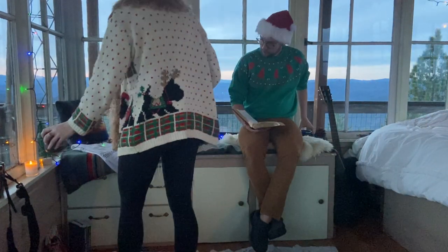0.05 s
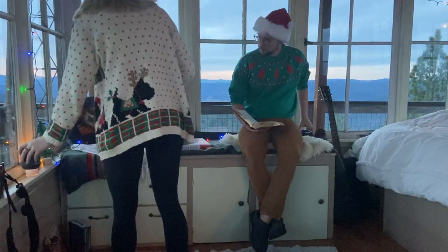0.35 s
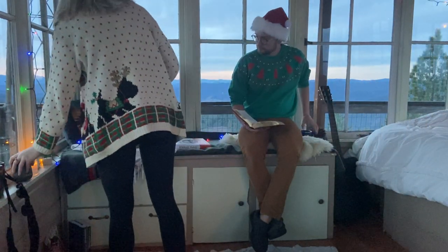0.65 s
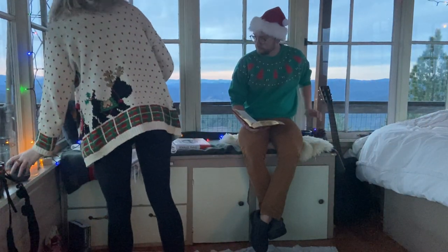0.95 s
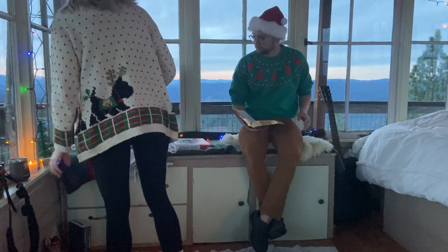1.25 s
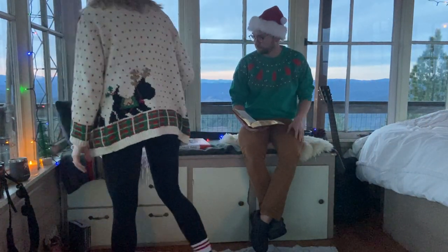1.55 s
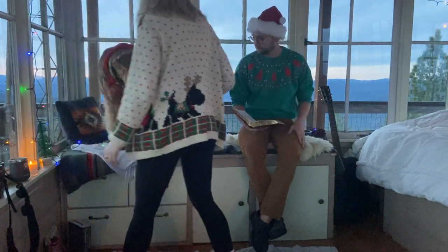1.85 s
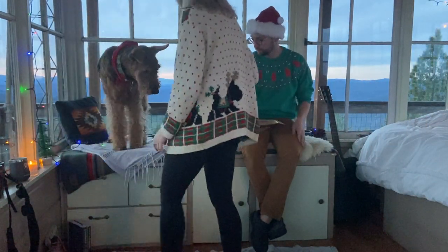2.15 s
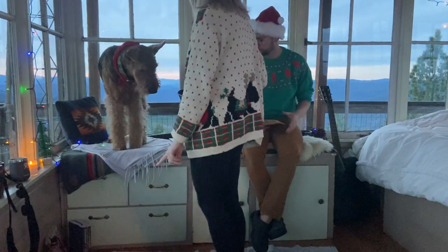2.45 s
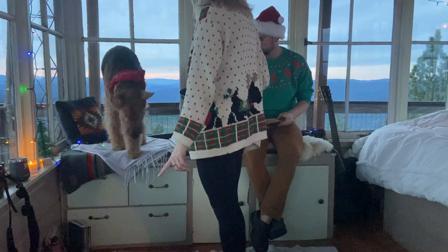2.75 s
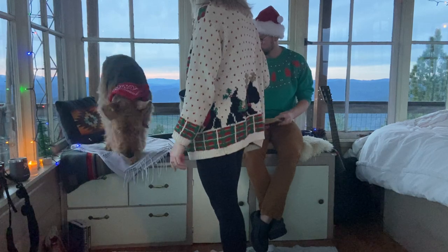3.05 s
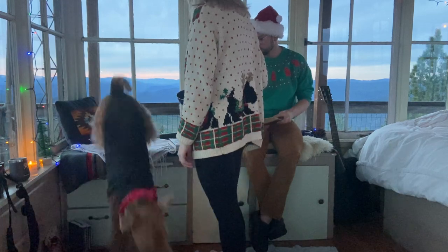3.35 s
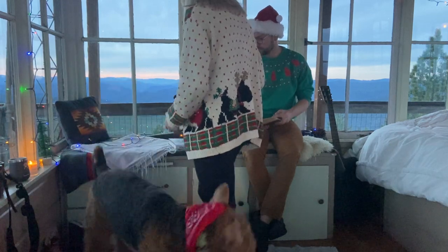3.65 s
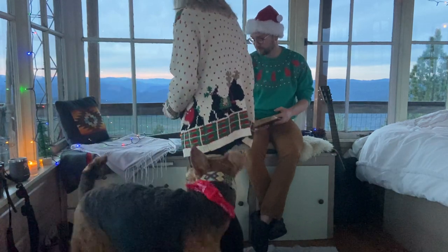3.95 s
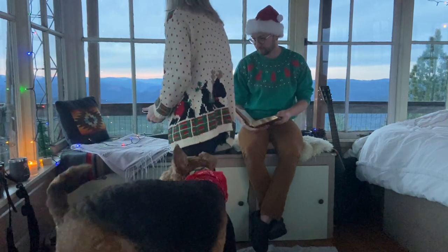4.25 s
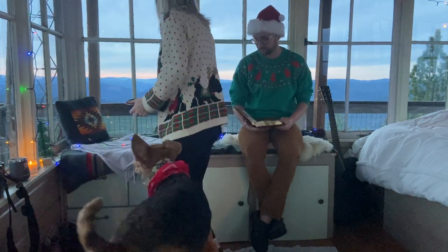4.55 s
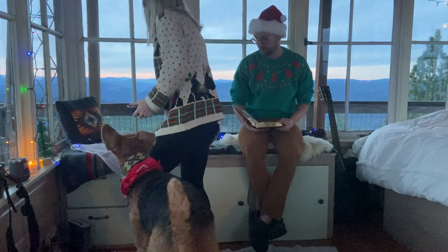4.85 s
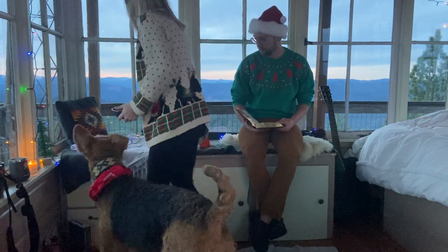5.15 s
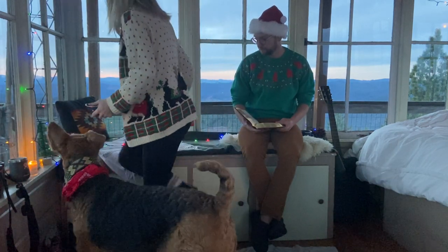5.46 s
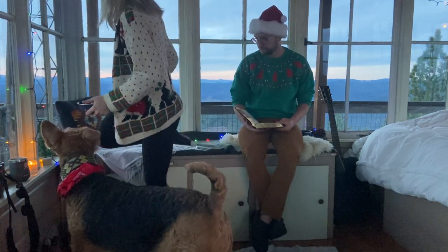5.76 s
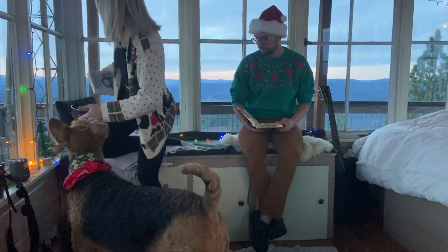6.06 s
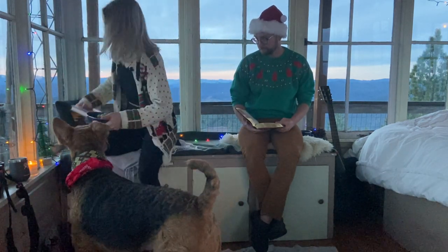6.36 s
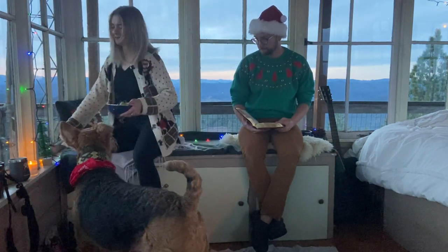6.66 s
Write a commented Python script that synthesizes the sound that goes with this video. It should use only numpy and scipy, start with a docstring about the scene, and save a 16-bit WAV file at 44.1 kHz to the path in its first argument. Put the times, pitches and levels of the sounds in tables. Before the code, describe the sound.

An ornament is set on a ledge with a ringing knock and rocks briefly. After a lull, a dog jumps off a bench, forepaws then hind paws thudding on the wooden floor, and walks around with bright tag clinks, claw ticks and light clatter. Cloth rustles, a person kneels with dull bumps, and a flat object clacks down. The stereo microphone stands in a small, quiet room with close walls.

```python
"""A small wooden room with many windows, heard on a stereo microphone inside, with walls close by.
Cloth rustles, an ornament knocks and rocks on a ledge a little to the left, and someone steps aside.
A big dog shuffles over the blanket on a window bench, jumps down and walks about: the floorboards thud,
claws tick, two collar tags clink and small things clatter. Then the person kneels on the padded bench
with a run of soft bumps, and last of all a flat object is put down."""
import sys
import numpy as np
from scipy import signal
from scipy.io import wavfile
from scipy.ndimage import uniform_filter1d

SR = 44100
rng = np.random.default_rng(int(sys.argv[2]) if len(sys.argv) > 2 else 0)


def dump(signal):
    """Clip the signal to [-1, 1] and save it as 16-bit WAV at the path in sys.argv[1]."""
    limited = np.clip(np.atleast_2d(signal).T, -1, 1)
    pcm = np.round(limited * 32767).astype(np.int16)
    wavfile.write(sys.argv[1], SR, pcm)


N = 300034
BAND_HZ = 28 * 2 ** np.arange(0, 9.3, .4)
TAIL = np.arange(int(.8 * SR)) / SR   # seconds since a contact
LEFT_RIGHT = np.array([[1], [-1]])

# The room's decay. Each row: frequency in Hz, t60 in seconds.
ROOM_T60 = [(50, 0.33), (150, 0.49), (500, 0.39), (1500, 0.39), (4000, 0.36), (8000, .3), (15000, 0.42)]
# First reflections off the near walls. Each row: delay in seconds, level in dB.
NEAR_WALLS = [(.0013, -11), (.0029, -7), (.0052, -15.5), (.0083, -15)]
# How alike the microphone's two sides are. Each row: frequency in Hz, correlation.
LIKENESS = [(50, .98), (130, .92), (250, .7), (500, .2), (1000, .12), (2000, .2), (4000, .45), (9000, .4),
            (11400, 0)]
# The lean to the left. Each row: frequency in Hz, left minus right in dB.
LEFT_DB = [(50, 2.5), (250, 1.1), (600, 3), (2500, 5), (8000, 0.6)]

# Noise colours at the microphone. Each row: frequency in Hz, spectral density in dB.
STILL_AIR = [(25, -8), (90, -5.5), (260, -14), (460, -18), (800, -25), (2500, -31), (4300, -30.5),
             (7000, -38.5), (11000, -34), (15000, -40.5)]
FLOOR_RUMBLE = [(25, -19), (40, -1.5), (58, 4.5), (110, -12), (200, -18.5), (400, -39), (1000, -55)]
CLOTH_RUB = [(100, -3), (250, 0), (500, 1), (1000, -6), (1800, -13), (4000, -35.5)]
CLOTH_SWISH = [(700, -13.5), (1800, -1.5), (3000, -3), (4300, 0), (6000, -9), (8000, -7.5), (11000, -15),
               (15000, -11.5)]
WOOD_KNOCK = [(60, -23), (140, -0.5), (300, -2), (500, 0.5), (900, -8), (1600, -15.5), (3200, -21.5),
              (5500, -30.5), (8000, -40.5), (15000, -32.5)]
TRINKET_CLICK = [(400, 13), (1000, 5), (2500, -5.5), (3500, 1.5), (7000, -4), (9000, -8.5), (15000, -8)]
TICK_TIP = [(700, -4), (1500, -0.5), (3000, 2.5), (4500, 0), (7000, -1.5), (11000, -7), (15000, -8.5)]
TICK_WOOD = [(120, -9.5), (350, 2.5), (700, -4.5), (1200, -6.5), (2200, -26), (6000, -41)]
FLOOR_THUD = [(28, -20.5), (50, 2.5), (120, -3), (220, -21), (450, -5), (900, -32.5), (2000, -35.5),
              (15000, -56.5)]
TAG_CLICK = [(2000, -31), (4000, -10.5), (8000, 2), (11500, -4.5), (15000, -13)]

# Modes that a blow sets ringing. Each row: frequency in Hz, level in dB, t60 in seconds.
ORNAMENT_KNOCK_MODES = [(118.5, -4, 0.36), (154.75, -10, 0.86), (251, -8.5, 0.84), (284, -15, 0.91),
                        (333, -18, 1), (422, -8, 0.37), (485.6, 9, 0.21), (568, -5, 0.46), (632, -16, 0.15),
                        (730, -5.5, 0.29), (750, -19.5, 0.97), (1000, -15, 0.21), (1390, -8.5, 0.26),
                        (1626, -12.5, 0.37), (2550, -18.5, 0.55), (2880, -13, 0.18), (3170, -14, .28),
                        (3680, -27.5, 0.17), (4430, -8, 0.19), (4390, -18, 0.25), (5830, -30, 0.13)]   # the ornament, the ledge and nearby things ringing together
FLAT_OBJECT_MODES = [(335, 4.5, 0.17), (433, -4, 0.12), (676, -2, 0.081), (980, -7, 0.096),
                     (1366, -7.5, 0.064), (3000, -23, 0.072)]
FLOOR_MODES = [(49.2, 0, 0.59), (55.3, -8.5, 0.58), (86.2, 2.5, 0.34), (121, 4.5, 0.18),
               (148.4, -6.5, 0.32), (194.6, -5, 0.23), (290, -10, 0.16), (382, -7, 0.091), (474.4, 0, 0.13),
               (572, -10, 0.3), (704, -25.5, 0.15), (996, -6.5, 0.22), (1070, -17, 0.16)]
LARGE_TAG_MODES = [(8120, -16, .12), (9432, -16, .16), (9810, -1, .24), (9866, 0, .26), (9913, -3, .24),
                   (10100, -3, .035), (14330, -9, .17)]
SMALL_TAG_MODES = [(8250, -18, .1), (11220, -7, .07), (11410, 0, .22), (11472, -2, .22), (11554, -10, .17),
                   (11700, -2, .035), (14400, -10, .16), (14650, -7, .04)]
# Modes of the small hard things. Each entry: frequency in Hz, with its level in dB on the next line.
TRINKET_HZ = [1500, 2520, 3200, 3750, 5430, 5830, 6500, 6910]
TRINKET_DB = [15.5, -7.5, 7, 13, -6.5, -15, 2, 19]

# The floor's rumble under shifting weight. Each row: time in seconds, level in dB.
FLOOR_STIR = [(0.0, -62), (0.98, -62.5), (1.42, -74), (2.33, -75.5), (3.13, -58), (3.31, -57.5),
              (3.66, -50.5), (3.9, -56), (5.47, -62), (5.74, -68.5), (6.46, -61.5), (6.8, -69)]
# Clothes, blanket and fur. Each row: start in seconds, length in seconds, rubbing in dB, swish in dB.
STROKES = [(0, 0.69, -73, -92), (0.937, .27, -75, -72), (1.702, 0.37, -82, -96), (2.738, .3, -64, -67.5),
           (3.024, .1, -61.5, -74), (3.728, 0.66, -64, -73.5), (4.482, .53, -67.5, -69.5),
           (5.497, 0.64, -74, -70.5), (6.262, 0.18, -78.5, -74.5)]
# Dull wooden bumps: paws, knees and hands on the bench, and one paw's knock on the floor.
# Each row: start in seconds, level in dB, pitch in Hz.
WOODEN_BUMPS = [(0.004, -45.5, 133.4), (2.024, -63.5, 195), (2.808, -56.5, 201), (3.099, -45.5, 100.5),
                (3.188, -46, 105), (4.009, -41, 357), (4.57, -58, 400), (5.191, -47, 127.6),
                (5.761, -46.5, 263.5), (6.068, -44.5, 278.6)]
# The ornament landing and rocking, and the flat object put down on the bench.
# Each row: start in seconds, level in dB, contact cut-off in Hz.
ORNAMENT_BLOWS = [(.741, -29.5, 11300), (.759, -30.5, 1560), (.785, -40.5, 1100), (.856, -46, 8000),
                  (0.859, -39, 444), (.881, -36.5, 200), (0.95, -49, 303)]
FLAT_OBJECT_BLOWS = [(6.739, -39.5, 12300), (6.744, -54, 2000), (6.765, -49, 5000), (6.788, -54, 900)]
# Small things knocking together. Each row: start in seconds, level in dB, favoured pitch in Hz.
CLATTER = [(0.855, -56.5, 3600), (3.757, -49, 6500), (3.774, -46, 6560), (4.581, -50, 3820),
           (4.607, -51, 3720), (5.083, -51.5, 3300), (5.092, -51, 6800), (5.098, -44, 2950)]
# Single hard contacts. Each row: start in seconds, tip in dB, wood in dB, contact cut-off in Hz.
TICKS = [(.166, -59, -64, 6150), (.365, -68, -64.5, 3980), (.447, -80, -64, 3000), (.534, -84.5, -61, 2940),
         (1.809, -67, -69.5, 3960), (2.029, -76, -69, 3000), (2.708, -67, -61.5, 3970),
         (3.03, -55.5, -70, 14100), (3.584, -59, -52.5, 12000), (4.203, -57.5, -64, 13040),
         (4.479, -78, -59, 3010), (4.802, -53.5, -55, 5960), (5.236, -56, -59.5, 13900),
         (5.756, -59.5, -50, 5030), (6.07, -53.5, -66.5, 9000), (6.705, -57, -57.5, 7030)]
# Soft treads with no click. Each row: start in seconds, level in dB, contact cut-off in Hz.
TREADS = [(0.199, -47.5, 122), (.29, -50, 230), (1.79, -60.5, 70), (2.498, -55, 60), (3.068, -49, 78),
          (3.171, -39.5, 66), (4.34, -51.5, 60), (4.418, -48.5, 70), (5.199, -55, 50)]
# The dog walking. Each row: start in seconds, claws in dB, weight in dB.
PAW_STEPS = [(4.243, -49, -55), (4.575, -51, -45.5), (4.758, -41, -39.5), (5.303, -49, -55)]
# The dog landing, forepaws then hind. Each row: start in seconds, pads in dB, weight in dB, claws in dB.
LANDINGS = [(3.389, -27.5, -28, -29.5), (3.690, -30.5, -28, -36.5)]
# The tags meeting. Each row: start in seconds, large tag in dB, small tag in dB, rise time in seconds.
CLINKS = [(3.387, -38.5, -30, 0.00045), (3.393, -41, -43, 0.0014), (3.414, -58, -61, .002),
          (3.583, -47, -40.5, 0.0022), (3.612, -41.5, -43, 0.025), (3.656, -44.5, -48, 0.014),
          (3.773, -47, -34.5, 0.00061), (3.836, -48.5, -54, 0.025), (4.597, -48, -43.5, 0.0012),
          (4.612, -48, -29, 0.0071), (4.799, -69, -61, 0.0018)]


def amp(db):
    """Decibels to gain."""
    return 10 ** (np.asarray(db) / 20)


def at_hz(points, hz):
    """Read a table on a log-frequency axis."""
    points = np.array(points)
    return np.interp(np.log(hz), np.log(points[:, 0]), points[:, 1])


def rms_one(x):
    """Scale to rms 1."""
    return x / np.sqrt(np.mean(x ** 2) + 1e-20)


def peak_one(x):
    """Scale so that the loudest hundredth of a second has rms 1."""
    return x / np.sqrt(uniform_filter1d(np.mean(x ** 2, axis=0), SR // 100).max() + 1e-20)


def add(out, s, sound):
    """Mix a sound in at s seconds."""
    start = int(np.clip(s * SR, 0, N - 1))
    out[:, start:start + sound.shape[1]] += sound[:, :N - start]


def drift(rate_hz):
    """A random wander with a spread near 1."""
    return np.interp(np.arange(N) / SR * rate_hz, np.arange(4000), rng.standard_normal(4000))


def lean_left(db):
    """Gains that put the left side db above the right."""
    return amp(db * LEFT_RIGHT / 2)


def contact(hz, cut_hz):
    """A soft contact lasts longer and so leaves out the highs."""
    return 1 / np.sqrt(1 + (hz / cut_hz) ** 4)


def band_gains(spectrum):
    """Wider bands carry more of a spectrum given per Hz."""
    return amp(at_hz(spectrum, BAND_HZ)) * np.sqrt(BAND_HZ)


def diffuse_field():
    """Narrow noise bands of rms 1; the bass reaches both sides of the microphone alike."""
    white, bands = rng.standard_normal((2, 2, N)), []
    for k, hz in enumerate(BAND_HZ):
        sos = signal.butter(2, [hz / 2 ** .2, hz * 2 ** .2], "band", fs=SR, output="sos")
        mid, side = signal.sosfilt(sos, white[k % 2])
        alike = at_hz(LIKENESS, hz)
        pair = np.sqrt(1 + alike) * mid + np.sqrt(1 - alike) * side * LEFT_RIGHT
        bands.append(rms_one(pair * lean_left(at_hz(LEFT_DB, hz))))
    return np.array(bands, dtype=np.float32)


def wash(field, spectrum):
    """Steady noise of a given colour from all round the room; rms 1."""
    noise = np.einsum("b,bcn->cn", band_gains(spectrum).astype(np.float32), field)
    return rms_one(np.roll(noise, rng.integers(N), axis=1))


def room_decay(crack_db, crack_s):
    """Envelope per band of one contact: a short crack, then the room dying away."""
    tail = amp(-60 * TAIL / at_hz(ROOM_T60, BAND_HZ)[:, None])
    rise = 1 - np.exp(-2 * TAIL * BAND_HZ[:, None])   # lows take about a cycle to build
    return (rise * (tail + amp(crack_db) * np.exp(-TAIL / crack_s))).astype(np.float32)


def burst(field, decay, spectrum, cut_hz=SR):
    """The countless short modes that one contact sets off, coloured by the near walls."""
    start = rng.integers(SR // 10, N - len(TAIL))
    decay = decay[:, :SR // 2]   # the room is silent after half a second
    bands = field[:, :, start:start + decay.shape[1]] * decay[:, None]
    even_out = np.sqrt(np.sum(decay ** 2, axis=1) / np.einsum("bcn,bcn->b", bands, bands))
    gains = (even_out * band_gains(spectrum) * contact(BAND_HZ, cut_hz)).astype(np.float32)
    direct = np.einsum("b,bcn->cn", gains, bands)
    # long waves bend round furniture; only the short ones bounce
    short_waves = signal.sosfilt(signal.butter(2, 450, "high", fs=SR, output="sos"), direct)
    out = direct.astype(float)
    for s, db in NEAR_WALLS:
        lag = int(s * SR * rng.uniform(.7, 1.3))
        out[:, lag:] += amp(db) * short_waves[:, :-lag]
    return np.pad(peak_one(out), [(0, 0), (0, len(TAIL) - out.shape[1])])


def ring(modes, scatter_db, cut_hz=SR, blur=0.99, blur_hz=40):
    """Decaying modes, weighed anew by each blow; echoes make each waver in level and phase."""
    out, knots = np.zeros((2, len(TAIL))), np.arange(400)
    for k, (hz, db, t60) in enumerate(modes):
        t = TAIL[:int(t60 * SR)]
        gain = amp(db + scatter_db * rng.standard_normal()) * contact(hz, cut_hz) * (-1) ** k
        echoes = rng.standard_normal(len(knots)) + 1j * rng.standard_normal(len(knots))
        waver = 1 + blur * np.interp(t * blur_hz, knots, echoes) * (1 - np.exp(-t / 0.0041))
        wave = waver * np.exp((2j * np.pi * hz - np.log(1000) / t60) * t)
        side_phase = np.arccos(at_hz(LIKENESS, hz)) / 2 * (-1) ** (k // 2)
        sides = np.exp(1j * side_phase * LEFT_RIGHT) * lean_left(at_hz(LEFT_DB, hz))
        rise = 1 - np.exp(-2 * hz * t)
        out[:, :len(t)] += gain * rise * np.imag(sides * wave)
    return peak_one(out)


def knocks(field, blows, modes, spectrum, ring_db, spread_db, crack_db, scatter_db, blur):
    """Blows on wood: the main modes they set ringing plus a dense spread of weaker ones."""
    out, decay = np.zeros((2, N)), room_decay(crack_db, crack_s=0.037)
    for s, db, cut_hz in blows:
        tone = amp(ring_db) * ring(modes, scatter_db, cut_hz, blur, blur_hz=35.5)
        spread = amp(spread_db) * burst(field, decay, spectrum, cut_hz)
        add(out, s, amp(db) * (tone + spread))
    return out


def room_tone(field):
    """Still air, faint and steady behind everything."""
    return amp(-73.5) * wash(field, STILL_AIR)


def movement(field, attack_s=0.07, release_s=0.11, catch_db=3.2, grain_db=1.5, stir_waver_db=3):
    """Shifting weight stirs the floor; cloth strokes swell and fade, catching and slipping."""
    t, rub, swish = np.arange(N) / SR, 0, 0
    for s, length_s, rub_db, swish_db in STROKES:
        speed = np.clip((t - s) / attack_s, 0, 1) * np.exp(-np.maximum(t - s - length_s, 0) / release_s)
        rub = np.hypot(rub, speed * amp(rub_db))
        swish = np.hypot(swish, speed * amp(swish_db))
    stir_db = np.interp(t, *np.transpose(FLOOR_STIR)) + stir_waver_db * drift(9)
    slips_db = catch_db * drift(35) + grain_db * drift(300)
    return (amp(stir_db + 1) * wash(field, FLOOR_RUMBLE)
            + rub * amp(slips_db - 1) * wash(field, CLOTH_RUB)
            + swish * amp(slips_db / 2 - 4.5) * wash(field, CLOTH_SWISH))


def kneeling(from_s=6.11, to_s=6.6, count=7, db=-50.5, hz=130.1):
    """Kneeling rocks the bench in an uneven run of bumps, laid out like WOODEN_BUMPS."""
    timing, level, pitch = rng.standard_normal((count, 3)).T
    starts = np.linspace(from_s, to_s, count) + 0.016 * timing
    return list(zip(starts, db + level, hz * np.exp(0.056 * pitch)))


def wooden_bumps(field, t60=0.22):
    """Weight lands softly on the bench or the floor: the wood sounds briefly at one pitch."""
    out, decay = np.zeros((2, N)), room_decay(crack_db=10, crack_s=0.0057)
    swell = 1 - np.exp(-TAIL / 0.0038)
    for s, db, hz in list(WOODEN_BUMPS) + kneeling():
        tone = amp(-7) * ring([(hz, 0, t60)], scatter_db=0)
        thud = amp(-6.5) * burst(field, decay, WOOD_KNOCK, cut_hz=160)
        add(out, s, amp(db) * swell * (tone + thud))
    return out


def trinket_clatter(field, t60=0.14, fall_db_per_octave=11.5):
    """Small hard things click and ring; where they meet favours the modes near one pitch."""
    out, decay = np.zeros((2, N)), room_decay(crack_db=1.5, crack_s=0.0044)
    for s, db, main_hz in CLATTER:
        modes = [(hz, mode_db - fall_db_per_octave * abs(np.log2(hz / main_hz)), t60)
                 for hz, mode_db in zip(TRINKET_HZ, TRINKET_DB)]
        colour = [(hz, band_db - fall_db_per_octave / 2 * abs(np.log2(hz / main_hz)))
                  for hz, band_db in TRINKET_CLICK]
        tone = amp(-4.5) * ring(modes, scatter_db=-1.5, blur=0.43, blur_hz=198)
        click = amp(-2) * burst(field, decay, colour)
        add(out, s, amp(db) * (tone + click))
    return out


def flat_object(field):
    """A flat object meets the bench with a sharp crack and a short ring."""
    return knocks(field, FLAT_OBJECT_BLOWS, FLAT_OBJECT_MODES, WOOD_KNOCK,
                  ring_db=-4.5, spread_db=-4, crack_db=30, scatter_db=6, blur=0.57)


def ornament(field):
    """An ornament lands and rocks to rest; it rings together with the ledge and nearby things."""
    return knocks(field, ORNAMENT_BLOWS, ORNAMENT_KNOCK_MODES, WOOD_KNOCK,
                  ring_db=-2, spread_db=-2.5, crack_db=-8, scatter_db=-2.5, blur=1)


def claws_and_ticks(field):
    """A hard tip clicks and the wood beneath answers lower down; a harder tip is brighter."""
    tips = []   # laid out like TICKS
    for s, _, _, db in LANDINGS:
        tips.append((s, db - 8, db - 8, 15000))   # toe tips touch
        tips.append((s + 0.018, db, db - 8.5, 4200))   # claws strike
    tips += [(s, db, db - 5.5, 6900) for s, db, _ in PAW_STEPS]
    out, decay = np.zeros((2, N)), room_decay(crack_db=2.5, crack_s=0.0034)
    for s, tip_db, wood_db, cut_hz in tips + list(TICKS):
        tip = amp(tip_db - 8) * burst(field, decay, TICK_TIP, cut_hz)
        wood = amp(wood_db - 1.5) * burst(field, decay, TICK_WOOD)
        add(out, s, tip + wood)
    return out


def collar_tags(field, blur=0.91, blur_hz=241.5):
    """Both tags ring at each touch and shimmer as they swing; a graze swells without a click."""
    out, decay = np.zeros((2, N)), room_decay(crack_db=11.5, crack_s=0.0033)
    for s, large_db, small_db, rise_s in CLINKS:
        large = amp(large_db) * ring(LARGE_TAG_MODES, scatter_db=2, blur=blur, blur_hz=blur_hz)
        small = amp(small_db) * ring(SMALL_TAG_MODES, scatter_db=0.98, blur=blur, blur_hz=blur_hz)
        click = amp(small_db - 19) * burst(field, decay, TAG_CLICK)
        rise = 1 - np.exp(-TAIL / rise_s)
        add(out, s, (amp(2) * (large + small) + click) * rise)
    return out


def footfalls(field, weight_lag_s=0.015):
    """The floorboards thud under the dog's landing, its steps and the soft treads."""
    blows = []   # laid out like TREADS
    for s, pads_db, weight_db, _ in LANDINGS:
        blows.append((s, pads_db, 900))   # pads slap
        blows.append((s + weight_lag_s, weight_db, 350))   # the weight arrives
        blows.append((s + 0.032, weight_db - 8.5, 120))   # the legs settle
    blows += [(s + weight_lag_s, weight_db, 62) for s, _, weight_db in PAW_STEPS]
    return knocks(field, blows + list(TREADS), FLOOR_MODES, FLOOR_THUD,
                  ring_db=-0.5, spread_db=-4.5, crack_db=4.5, scatter_db=3.5, blur=0.39)


def scene():
    """The room from the microphone's place; the ledge and the bench's end are a little to the left."""
    field = diffuse_field()
    objects = (ornament(field) + flat_object(field)) * lean_left(db=1)
    return (objects + footfalls(field) + collar_tags(field) + trinket_clatter(field)
            + claws_and_ticks(field) + wooden_bumps(field) + movement(field) + room_tone(field))


def record(dry):
    """The microphone drops the deepest bass and the very top."""
    low_cut = signal.butter(2, 28, "high", fs=SR, output="sos")
    high_cut = signal.ellip(10, .1, 80, 15800, fs=SR, output="sos")
    return signal.sosfilt(high_cut, signal.sosfilt(low_cut, dry))


dry = scene()
out = record(dry)
dump(out)
```